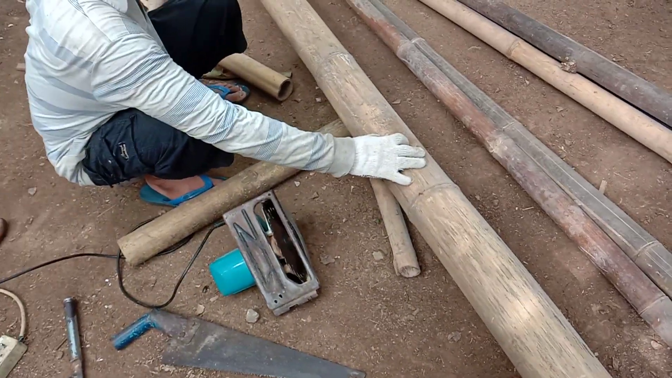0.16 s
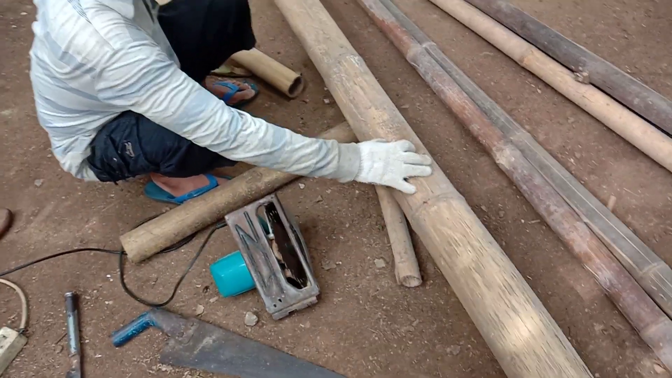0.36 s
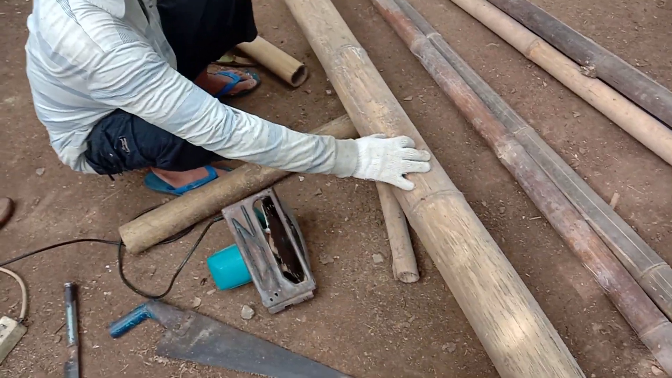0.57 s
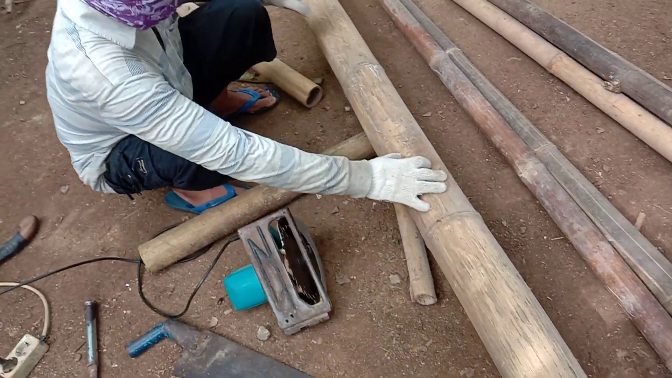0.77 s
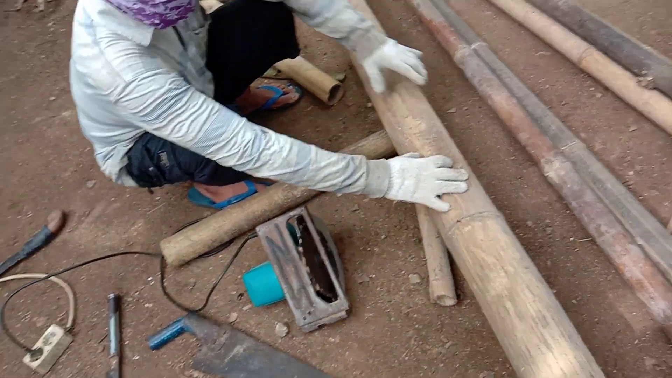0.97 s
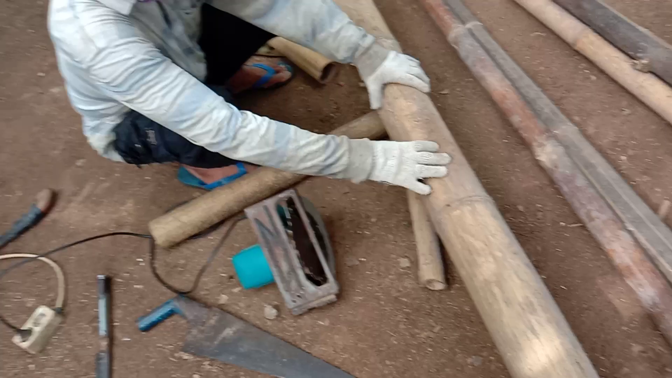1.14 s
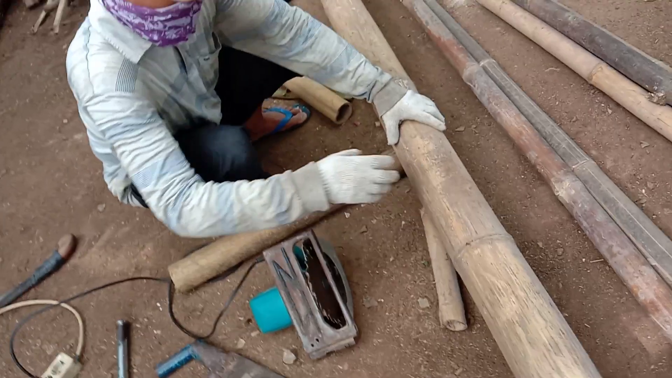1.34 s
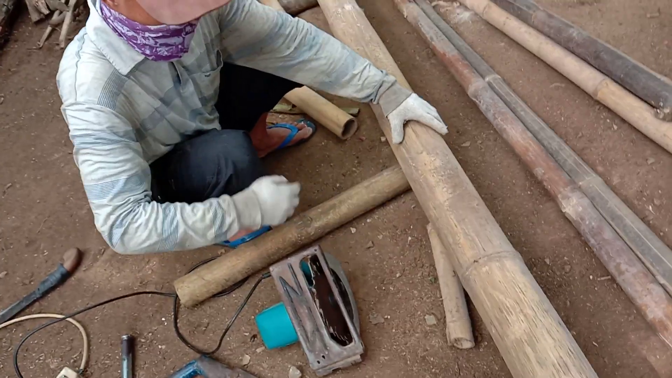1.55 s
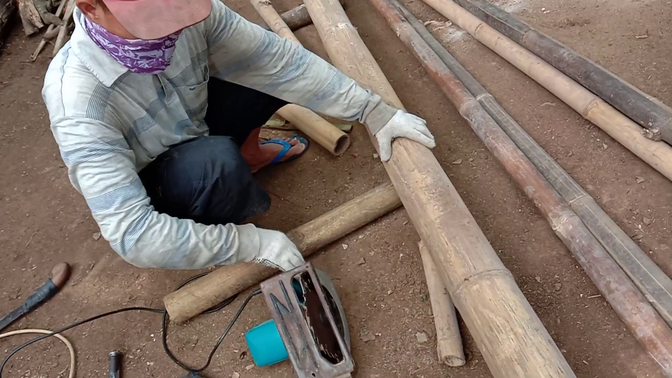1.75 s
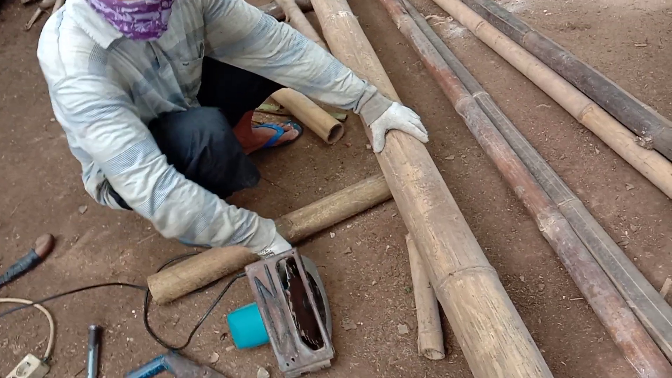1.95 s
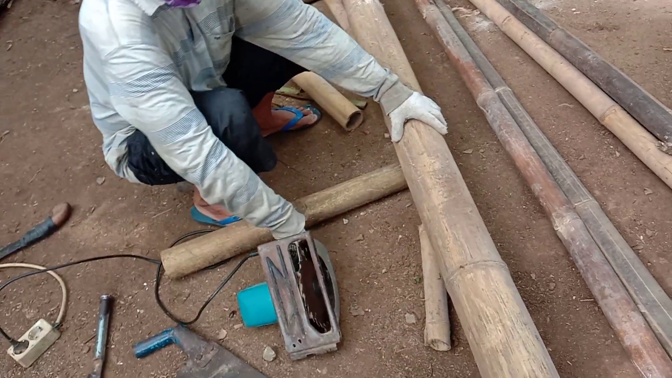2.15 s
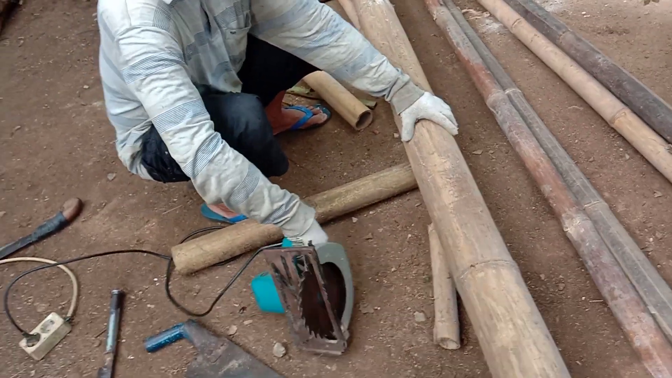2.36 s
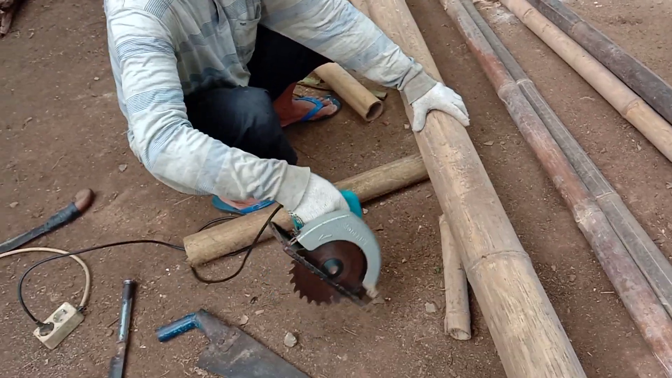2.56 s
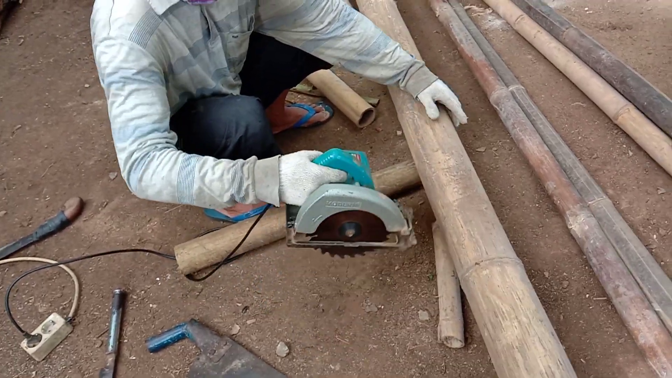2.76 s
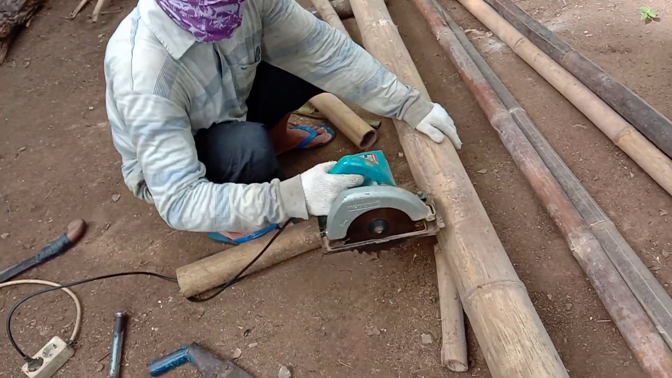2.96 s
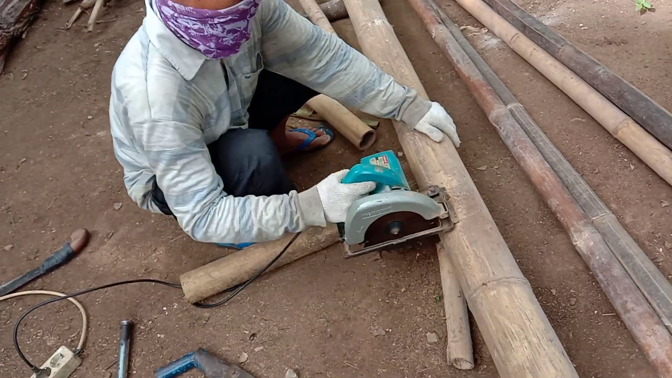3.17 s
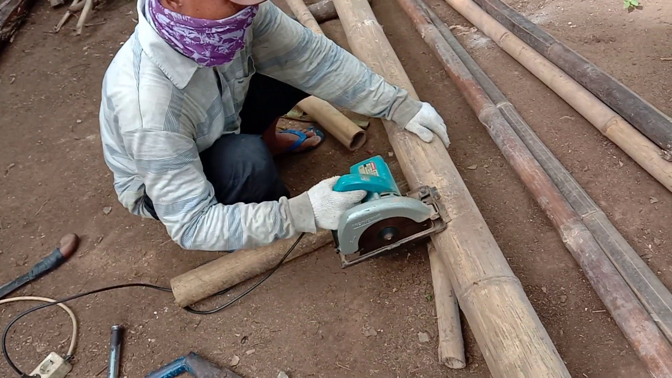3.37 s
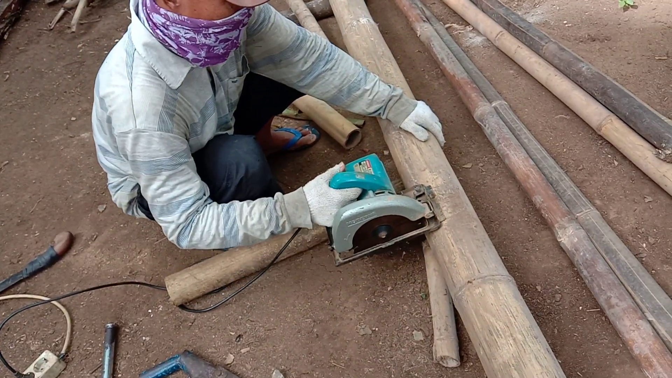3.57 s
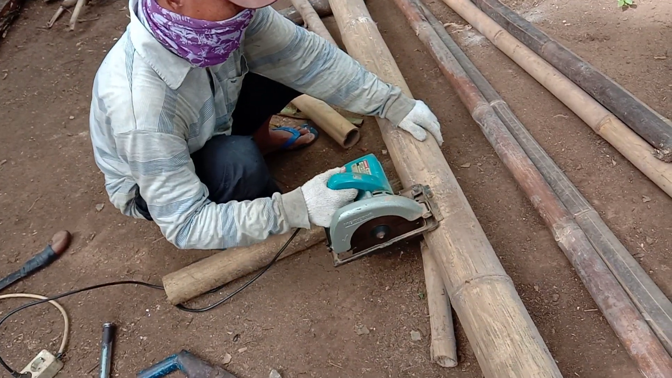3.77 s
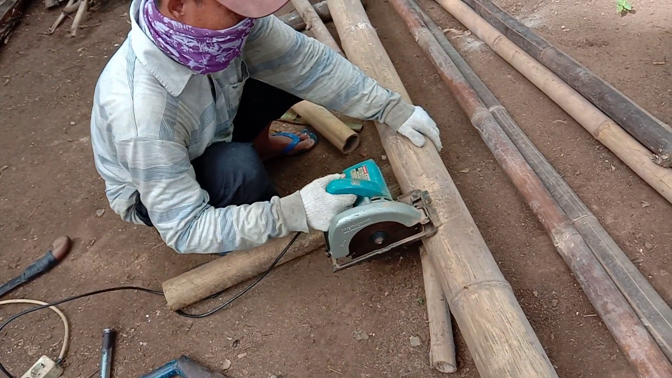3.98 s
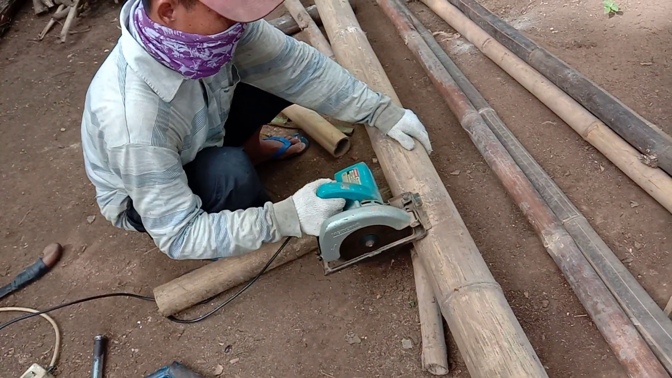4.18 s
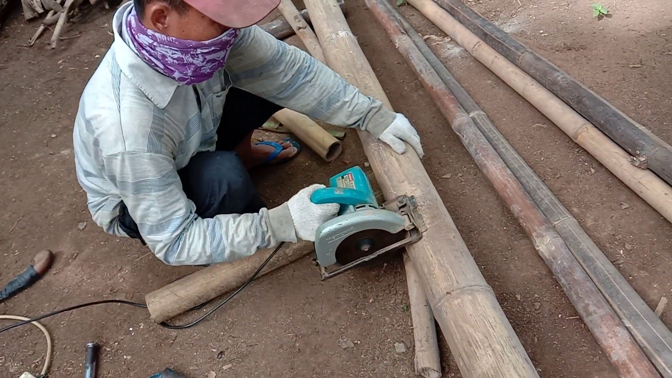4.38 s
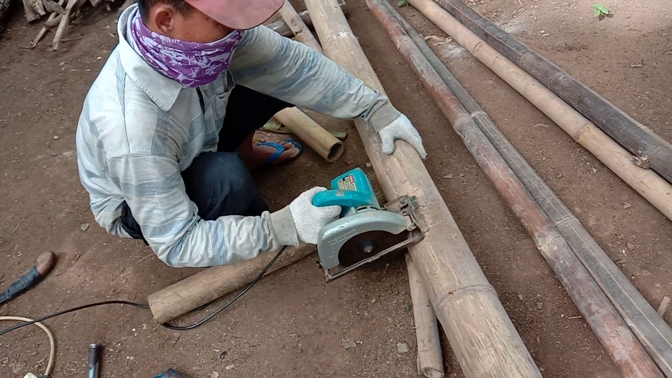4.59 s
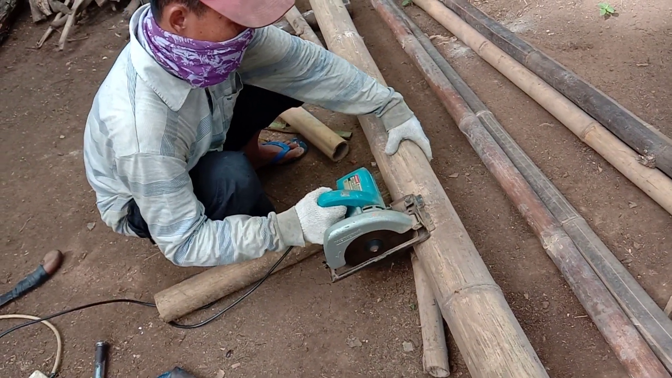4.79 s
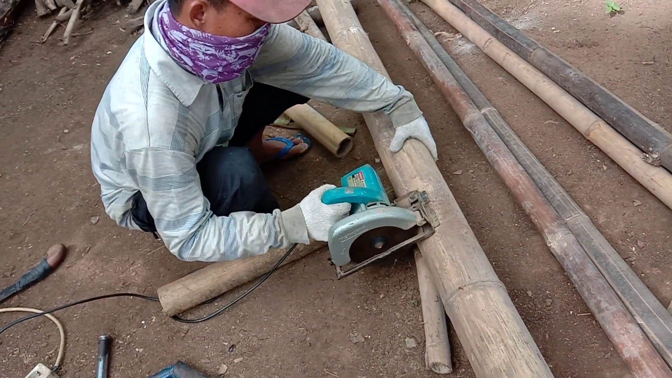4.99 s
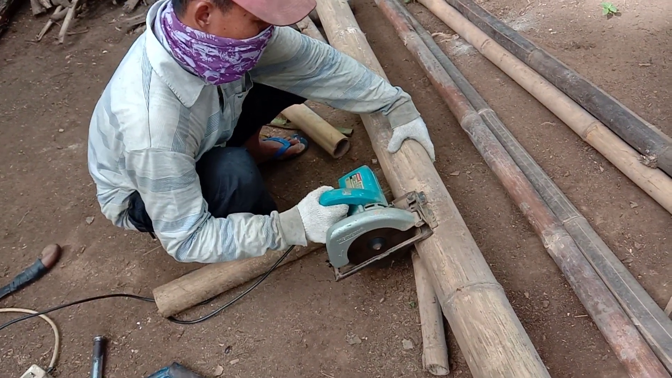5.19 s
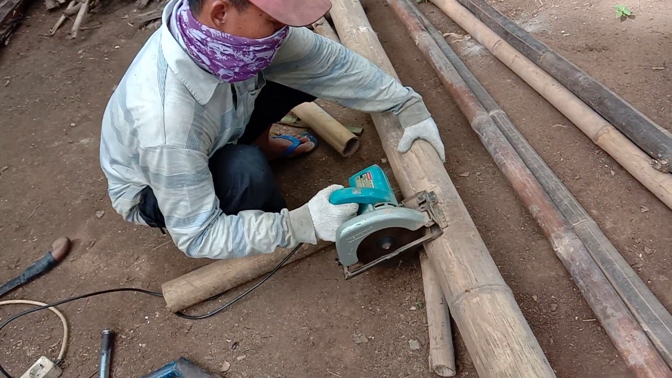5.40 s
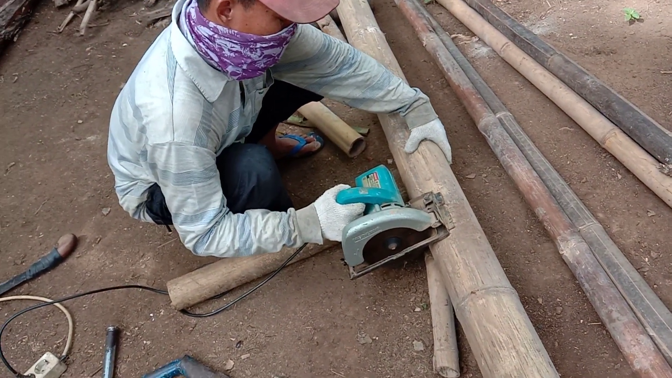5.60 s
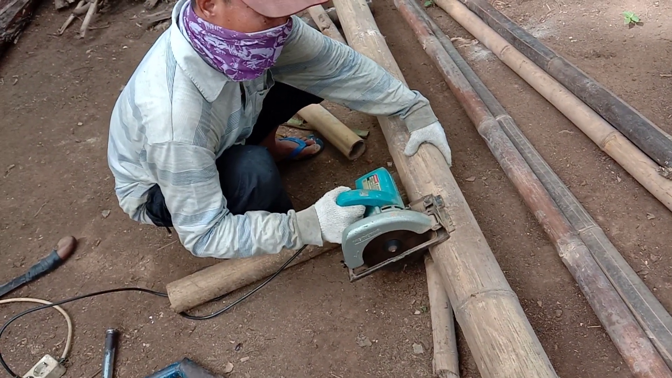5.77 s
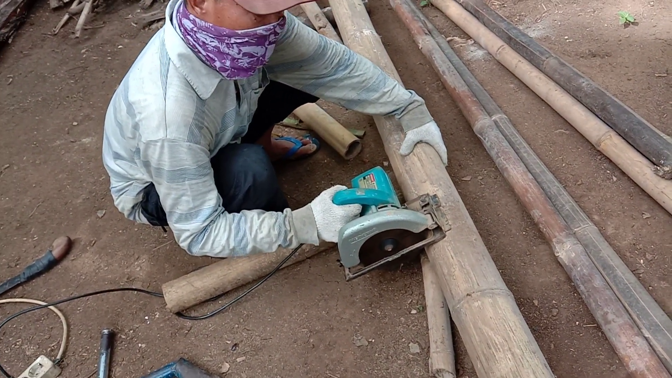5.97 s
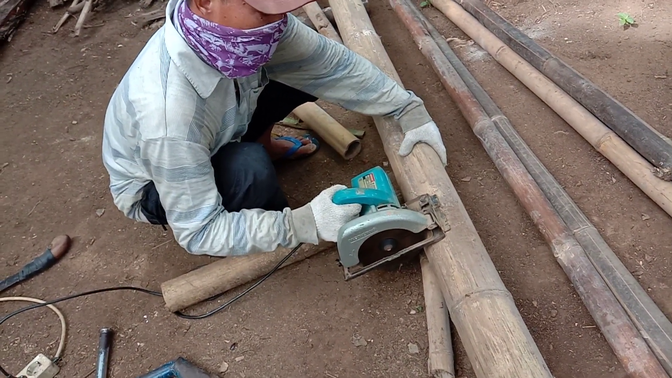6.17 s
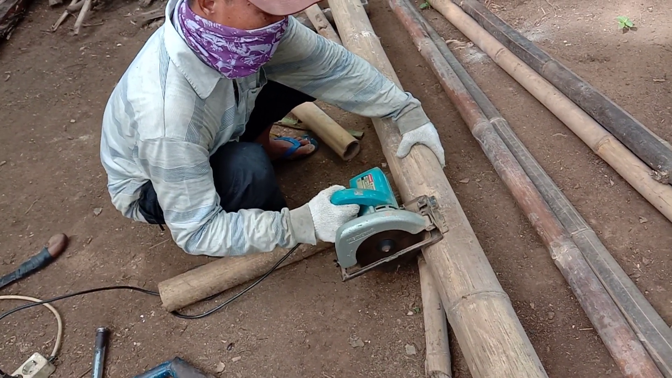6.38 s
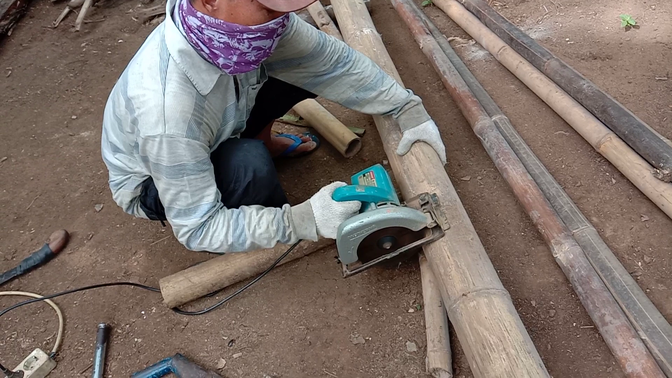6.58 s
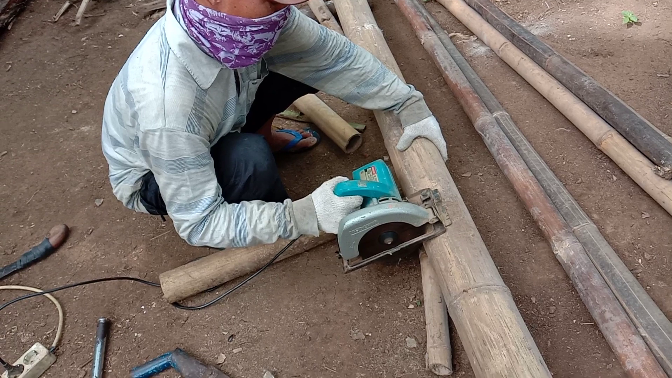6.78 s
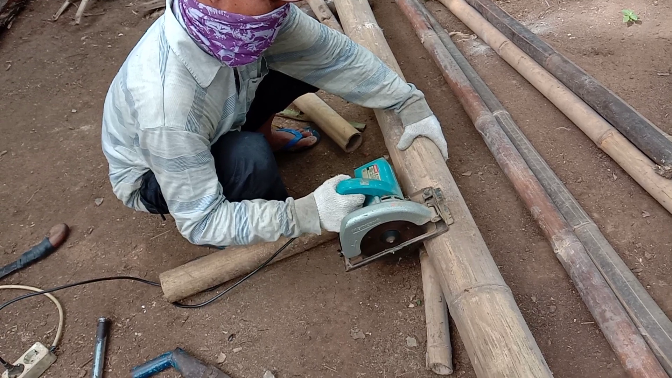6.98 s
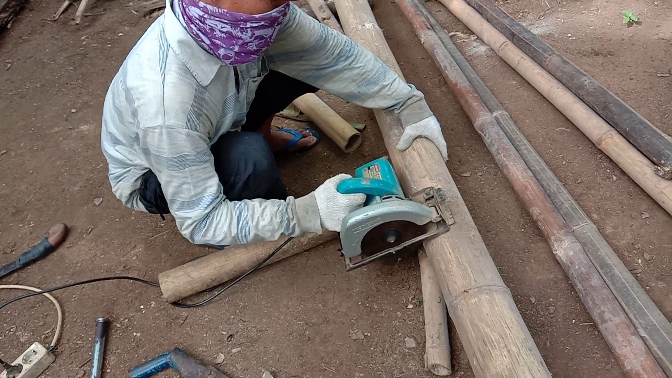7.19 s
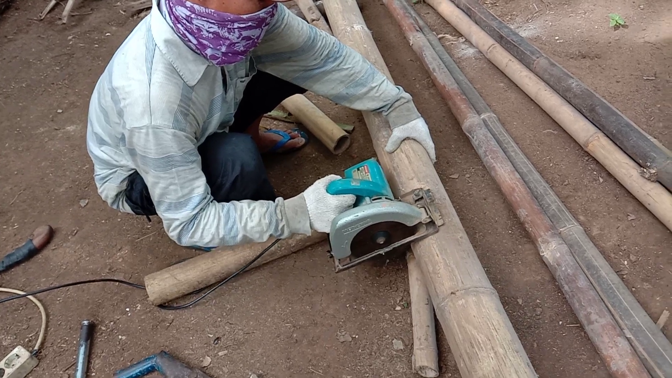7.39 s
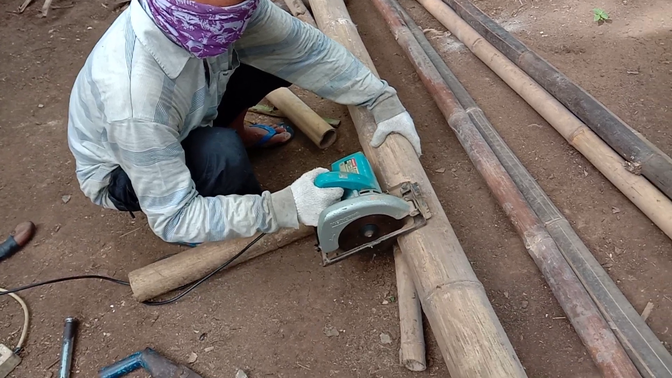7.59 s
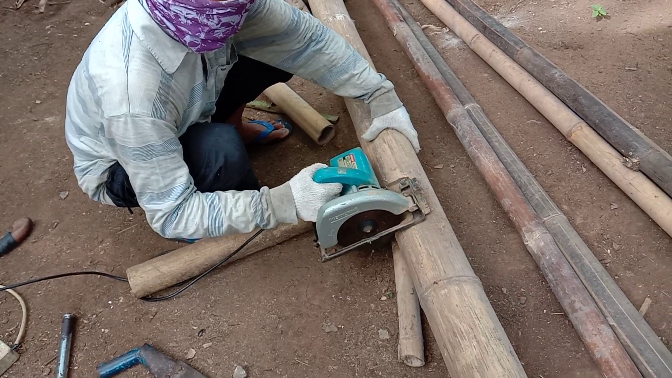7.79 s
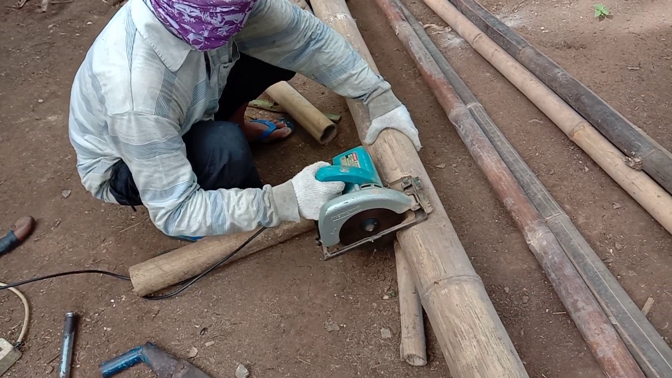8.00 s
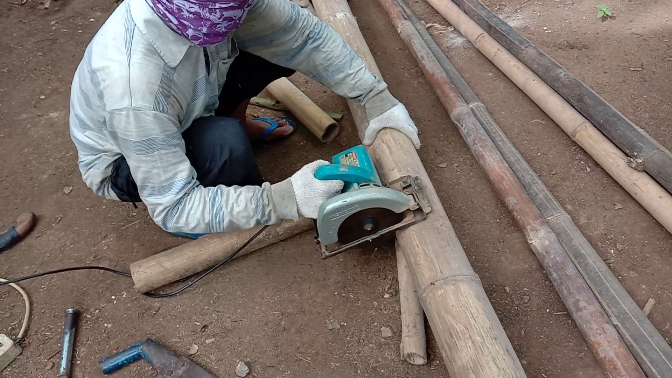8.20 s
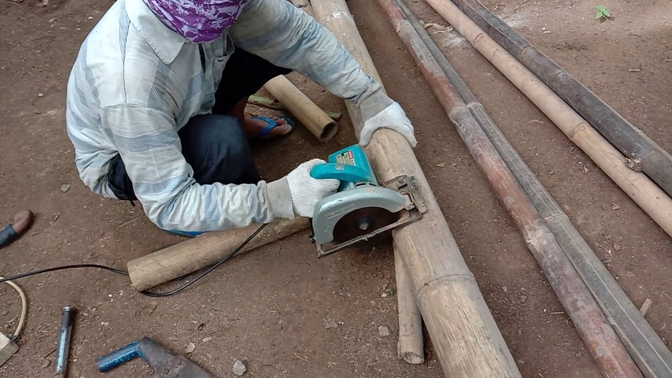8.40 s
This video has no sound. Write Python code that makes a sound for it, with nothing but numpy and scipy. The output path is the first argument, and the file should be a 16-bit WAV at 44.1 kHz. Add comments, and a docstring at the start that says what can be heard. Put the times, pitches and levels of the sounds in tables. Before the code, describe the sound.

After hollow wooden thuds and tool handling, an electric saw spins up with a rising whistle, then rasps loudly through thick bamboo outdoors.

```python
"""A circular saw spins up close by with a rising whistle; its gears and blade sing, then its teeth bite bamboo.
The saw is motor and gear harmonics, blade resonances and filtered noise, led by the stage of the work.
Before it, a worker settles a thick pole and lifts the saw: noise bursts and ringing modes knock, clank and rub.
Air and sawdust from the cut thump on the microphone as coloured noise. Outdoors, cicadas sing in narrow
noise bands, an engine throbs far off as a few sines, and the yard hushes as filtered noise."""
import sys
import numpy as np
from scipy import signal
from scipy.fft import rfft, irfft
from scipy.io import wavfile
from scipy.ndimage import uniform_filter1d

SR = 44100
rng = np.random.default_rng(int(sys.argv[2]) if len(sys.argv) > 2 else 0)


def generate_wav(sig):
    """Save sig (samples, or channels by samples) to the path in sys.argv[1] as 16-bit PCM at SR."""
    pcm = np.round(np.clip(np.atleast_2d(sig).T, -1, 1) * 32767).astype(np.int16)
    wavfile.write(sys.argv[1], SR, pcm)


N = 372644
TIME = np.arange(N) / SR  # s
FREQ = np.maximum(np.fft.rfftfreq(N, 1 / SR), 1)  # Hz

# Hush of the yard: [f/Hz, level/dB], relative
HUSH_SPECTRUM = [(15, -33), (25, -36), (95, -10), (217, -18.5), (301, -33), (328, -16.5), (366, -29.5),
                 (486, -25), (530, -30), (999, -33), (1240, -16), (1720, -36), (3110, -36), (4600, -46.5),
                 (5980, -93), (10100, -120)]
HUSH_DB = -52
# Far engine: [t/s, firing pitch f/Hz, level/dB]
FAR_ENGINE = [(1.2, 75, -58), (1.37, 74, -43), (1.55, 76, -59), (1.8, 79, -44), (2.3, 87, -51),
              (2.39, 87, -42), (3.3, 89, -35), (3.55, 91, -45.5), (4.2, 94, -55)]
# Loudness of the cicada chorus: [t/s, level/dB]
CICADA_LEVELS = [(0, -42.5), (.3, -38.5), (1, -37.5), (3.4, -37), (4.2, -39.5)]
# Bands of cicada song and faint top hiss: [f/Hz, spread/Hz, power level/dB], relative;
# half amplitude lies spread / 1.14 from the centre
CICADA_BANDS = [(5192, 39, -9), (5214, 82, -6), (5120, 70, -26), (5305, 13, 0.5), (5340, 36, -16),
                (5410, 19, -9.5), (7200, 200, -42.5), (14000, 2500, -53), (10600, 150, -44)]

# Knocks of the pole: [t/s, peak level/dB, nominal t60/s, tilt/(dB per octave), contact rise/s]
POLE_KNOCKS = [(.009, -8, 0.056, -1.5, 0.0012), (.163, -6, 0.2, 1, 0.0012), (.24, -19.5, 0.12, 3, 0.017),
               (.464, -25, 0.042, -4, 0.0013), (.545, -18, 0.18, .5, 0.0077),
               (1.155, -23.5, 0.1, 6.5, 0.00078), (1.317, -17.5, 0.2, 1, 0.0025),
               (1.825, -30.5, 0.16, -7.5, 0.0076), (1.868, -27.5, 0.16, -5, 0.017),
               (2.2, -36.5, .2, -13, .011), (2.683, -34.5, 0.2, -6.5, 0.0074),
               (3.18, -14.5, 0.17, 2, 0.0017)]
# Clanks of the saw's base plate, guard and switch: [t/s, peak level/dB, nominal t60/s,
# tilt/(dB per octave), contact rise/s]
SAW_CLANKS = [(2.349, -18.5, .2, 3.5, 0.0077), (2.408, -22, .1, 5.5, .003), (2.521, -19, .06, -1.5, .001),
              (2.575, -22, .06, -2, .0005), (2.745, -24.5, .18, -1, .008), (3.179, -9, 0.24, 1.5, .0014),
              (3.491, -34, .19, -2.5, .012), (4.201, -6, 0.049, 1, 0.0034)]
# Dull bumps and puffs of air: [t/s, peak level/dB, nominal t60/s, tilt/(dB per octave), contact rise/s]
DULL_BUMPS = [(1.045, -17, 0.042, 1, .0006), (2.944, -26, 0.047, -2, .002), (5.595, -26, 0.057, -6, .005),
              (6.335, -29.5, .07, -3, .004), (6.725, -13, 0.062, -7, 0.0054)]
# Ringing modes of the bamboo: [f/Hz, mean level/dB, longest t60/s], relative
BAMBOO_MODES = [(237, -18.5, 0.38), (395, -16, 0.27), (511, -19, 0.13), (782, 3, 0.042), (1262, -17.5, 5.0),
                (1530, -34.5, 0.48), (1920, -42, 5.0), (2040, -13, 0.094), (2234, -47, 0.68),
                (2589, -27.5, 0.2), (2770, -26, 0.11), (3830, -36, 0.33)]
# Noise of a blow on the bamboo: [f/Hz, level/dB], relative
BAMBOO_SPECTRUM = [(100, -24), (250, 5), (750, -2), (1300, -6.5), (3000, -5.5), (5000, -19.5), (8000, -38),
                   (15000, -62)]
# Ringing modes of the saw's metal parts: [f/Hz, mean level/dB, longest t60/s], relative
METAL_MODES = [(374, -17.5, 5.0), (760, -17, 5.0), (974, -27, 0.079), (1295, 1.5, 0.13), (1482, 0, 0.19),
               (1580, -24, 0.14), (1940, -32, 0.3), (2378, 1, 0.06), (2740, -21, 1.3), (3020, -31, 0.18),
               (3090, -16.5, 0.026), (3770, -40, 0.33), (4274, -56, 5.0), (5110, -21, 0.05)]
# Noise of a blow on the saw's metal parts: [f/Hz, level/dB], relative
METAL_SPECTRUM = [(100, -18), (350, -7.5), (600, -21.5), (1100, 6), (2000, -0.5), (4500, -12.5),
                  (8000, -28.5), (15000, -42)]
# Noise of a dull bump: [f/Hz, level/dB], relative
BUMP_SPECTRUM = [(30, -51), (80, 2.5), (140, -3.5), (300, -6.5), (1000, -15.5), (4000, -36), (12000, -77)]
# Strokes of gloves and sleeves: [middle t/s, half length/s, level/dB]
CLOTH_STROKES = [(.324, .016, -43.5), (0.381, 0.0065, -42), (0.909, 0.037, -44), (1.005, 0.031, -45.5),
                 (1.111, 0.023, -37), (1.208, 0.052, -39.5), (1.624, 0.061, -43), (1.976, .09, -52),
                 (2.25, 0.09, -44.5), (2.83, 0.16, -53.5), (3.268, 0.032, -52)]
# Rubbing cloth: [f/Hz, level/dB], relative
CLOTH_SPECTRUM = [(300, -6.5), (1200, 0.5), (2600, 8.5), (4500, -2.5),
                  (7000, -11.5), (8500, -27.5), (11500, -25.0), (15000, -35)]
# The clothes shuffle at random under the strokes until the worker holds still
SHUFFLE_DB, SHUFFLE_SPREAD_DB, STILL_S, SETTLE_S = -65.5, 1.5, 3.76, 0.3
# Pole juddering over its rest: [f/Hz, level/dB], relative
DRAG_SPECTRUM = [(71, -43.5), (120, -41), (222, 3.5), (260, -14), (383, -3), (1140, -5.5), (1650, -21.5),
                 (2840, -20.5), (4890, -42), (5340, -40), (8000, -63.5), (10400, -96.5), (17600, -120)]
# DRAG_DB is the level extrapolated to t = 0
DRAG_S, DRAG_STOP_S, DRAG_RELEASE_S, DRAG_DB, DRAG_FADE_DB_PER_S = 0.0083, 0.11, 0.024, -14, -90

# Air thumping on the microphone: [f/Hz, level/dB], relative
BUFFET_SPECTRUM = [(15, -57), (25, -21), (32, -34), (74, -2.5), (102, 1.5), (182, 1), (223, -1.5),
                   (335, -2.5), (800, -7.5), (1040, -12), (1760, -120)]
# Brief lulls of that air: [middle t/s, half length/s, level change/dB]
DRAUGHT_LULLS = [(7.047, 0.022, -7.5), (7.124, 0.018, -11), (7.573, 0.026, -4)]
# It sets in as the blade breaks through, and gusts
DRAUGHT_S, DRAUGHT_RISE_S, DRAUGHT_DB, GUST_DB = 6.87, 0.063, -19, 1.44

# Motor shaft turns per turn of the blade's spindle; moment of switching on
GEAR_RATIO, SWITCH_ON_S = 6.135, 4.196
# The motor closes in on its no-load speed, fast at first and then ever more slowly
NO_LOAD_HZ, SPIN_UP_S, SPIN_UP_POWER = 680, 0.182, 0.62
# Highest motor shaft speed with the blade on the pole: [t/s, shaft turns f/Hz]
LOADED_SPEED = [(5.45, 490), (5.8, 492), (6.2, 497), (6.5, 492), (6.75, 477), (6.9, 460), (7.35, 388),
                (7.5, 376), (7.8, 369), (8.1, 374), (8.45, 371)]
# The teeth first graze the pole; the bite is full once this much speed is lost
TOUCH_S, TOUCH_RISE_S, FULL_BITE_SAG_HZ = 5.43, 0.045, 60
# Stages of the work, in rows: switched on, half speed, running free, grazing the skin, biting deep;
# [level/dB, treble boost/dB, gear whine/dB re rush, blade ring/dB re rush, power share of rasp 0-1]
WORK_STAGES = [(-16.5, -20, -29, -21, 0.56), (-19, -6, -10, -26, 0.33), (-16, -2.5, -38, -38, 0),
               (-15.5, 8.5, -2.5, -4.5, 0.19), (-13, 11, -9, -8, 0.82)]
# The hand pushes the saw on: [middle t/s, half length/s, boost/dB]
HAND_PUSHES = [(7.396, 0.05, 2), (7.86, .09, 2), (8.245, 0.1, 1.7)]
# The feed is uneven in the cut
CHATTER_DB, CHATTER_PER_S = 0.88, 30
# Gear whine: [multiple of the motor shaft, free level/dB, loaded level/dB], relative
WHINE_PARTIALS = [(1, -21, -25), (2, -8, -14), (3, -12, -5), (4, 0, -4), (5, -9, -12), (6, -13, -4),
                  (7, -5, -12), (8, -6, -1), (9, -12, -10), (10, -12, -9), (11, -13, -18), (12, -4, -9),
                  (14, -11, -22), (16, -16, -22), (18, -19, -27), (20, -22, -24), (22, -19, -27),
                  (28, -28, -34), (30, -27, -34)]
# Blade resonances in which the whine flares: [f/Hz, width/Hz, boost/dB]
WHINE_PEAKS = [(1228, 61, 7.4), (1700, 48, 6.5), (4140, 750, 8)]
# Modes of the steel blade: [f/Hz, width/Hz, power level/dB], relative
BLADE_MODES = [(1224, 4.9, 1.5), (1265, 11, -7.5), (1529, 8.5, -0.5), (1596, 7.5, -0.5), (1794, 6.7, 1.5),
               (2168, 13, -4), (2585, 9.5, 1), (2520, 51, -13), (3407, 6.3, -9.5), (3480, 9.1, -5),
               (3880, 24, 0.5), (4300, 9.2, -5.5), (6770, 41, -1), (7330, 52, -4.5)]
# Fine resonances and dips of guard and housing: [f/Hz, width/Hz, boost/dB]
GUARD_PEAKS = [(1280, 57, 3.5), (3030, 650, 6), (4070, 76, 6.5), (5860, 1070, -11.5), (6690, 890, 4.5),
               (8210, 970, -8.5), (11000, 760, 3.5), (13600, 1000, -12)]
# Air and brushes, running free: [f/Hz, level/dB], relative
AIR_SPECTRUM = [(59, -64), (100, -31.5), (306, -19.5), (393, -20), (529, -16.5), (1230, 2), (1650, -4),
                (1760, -2), (3600, -5), (4000, -2.5), (5600, -6), (6770, -14), (8180, -20.5),
                (11000, -25.5), (15400, -35)]
# Teeth tearing fibres: [f/Hz, level/dB], relative
RASP_SPECTRUM = [(350, -20), (600, -24), (927, -7), (1270, 3.5), (1930, -2), (2600, 0.5), (3700, -14.5),
                 (4020, -0.5), (5060, -1.5), (5640, -5.5), (6910, -17), (8360, -20.5), (11400, -24),
                 (15400, -32)]
# Mains growl of the starting current: [f/Hz, peak level/dB]
STARTING_GROWL = [(100, -57), (200, -46.5), (300, -42.5), (400, -42.5)]
# Whistles of the free blade: [multiple of the blade's turn, level/dB at half speed, level/dB at full speed],
# before colour and damping; touching the pole damps them
BLADE_WHISTLES = [(60, -26.5, -27), (90, -33, -46), (120, -34, -48), (180, -47, -54)]
WHISTLE_DAMPING_DB = -5
# How the whistles radiate: [f/Hz, level/dB]
WHISTLE_SPECTRUM = [(1000, -35), (1900, -12), (2350, -1), (4800, -2), (5800, -12), (7000, -3), (9000, -17),
                    (13000, -16)]
# Resonances in which the whistles flare: [f/Hz, width/Hz, boost/dB]
WHISTLE_RESONANCES = [(2950, 260, 9), (3950, 400, 1.5), (5120, 300, 8)]
# The blade howls as it binds in the kerf:
# [middle t/s, half length/s, multiple of the motor shaft, level/dB before flutter]
BINDING_HOWLS = [(5.53, .09, 4, -19), (5.55, .12, 12, -32), (6.1, .35, 4, -26), (6.78, .13, 8, -29),
                 (6.98, .09, 4, -20), (7.01, .04, 3, -24), (7.06, .16, 12, -28), (7.08, .14, 16, -32),
                 (7.16, .05, 3, -20.5), (7.25, .08, 10, -22.5), (7.32, .14, 8, -25.5),
                 (7.34, .06, 6, -24.5)]
# The blade's strongest mode squeals on its own: [middle t/s, half length/s, level/dB before flutter]
MODE_SQUEALS = [(5.64, .08, -25), (5.97, 0.081, -17), (6.44, 0.078, -23.5)]
SQUEAL_HZ = 1768

TOP_HZ = 15550  # upper limit of the microphone signal


def undb(db):
    """Decibels to gain."""
    return 10 ** (np.asarray(db) / 20)


def unit(x):
    """Scale to rms 1."""
    return x / (np.std(x) + 1e-12)


def curves(table):
    """Each column of a table, joined by straight lines in time."""
    s, *columns = np.transpose(table)
    return [np.interp(TIME, s, c) for c in columns]


def during(table, fade_s):
    """1 while a table lasts, fading outside it."""
    return np.clip(1 + np.minimum(TIME - table[0][0], table[-1][0] - TIME) / fade_s, 0, 1)


def ramp(s, rise_s):
    """0 before a moment, then a straight rise to 1."""
    return np.clip((TIME - s) / rise_s, 0, 1)


def swell(s, half_s):
    """A bell-shaped rise and fall around a moment, down to 1/e at half_s from it."""
    return np.exp(-np.minimum(((TIME - s) / half_s) ** 2, 50))


def shape_db(points, freq=FREQ):
    """A spectrum joined on a log-frequency axis, falling 20 dB per octave beyond its ends."""
    hz, db = np.transpose(points)
    octaves, known = np.log2(freq), np.log2(hz)
    beyond = abs(octaves - np.clip(octaves, known.min(), known.max()))
    return np.interp(octaves, known, db) - 20 * beyond


def boost_db(resonances):
    """Gain in dB per frequency of a table of resonances."""
    return sum(db / (1 + (2 * (FREQ - f) / w) ** 2) for f, w, db in resonances)


def peaks(modes):
    """Summed resonance curves, each with the power that its dB gives."""
    return sum(undb(db) / np.sqrt(w) / (1 + (2 * (FREQ - f) / w) ** 2) for f, w, db in modes)


def colour(x, db):
    """Filter by a gain in dB per frequency; rms 1."""
    return unit(irfft(rfft(x) * undb(db), N))


def noise():
    """White noise."""
    return rng.standard_normal(N)


def walk(rate):
    """Smooth random wander, spread near 1, with about this many turns per second."""
    knots = rng.standard_normal(N // 8)
    wander = np.interp(TIME * rate, np.arange(len(knots)), knots)
    return unit(uniform_filter1d(wander, max(int(SR / rate / 2), 1)))


def grains(rate, spread_db):
    """Clicks at random moments, rate per second on average, with uneven sizes."""
    moments = rng.random(N) < rate / SR
    sizes = undb(spread_db * np.clip(noise(), -2.5, 2.5))
    return unit(moments * np.sign(noise()) * sizes)


def once_a_turn(angle, count):
    """An uneven pattern that repeats with every turn of a wheel."""
    turn = np.linspace(0, 2 * np.pi, 256)
    pattern = sum(np.cos(k * turn + rng.uniform(0, 2 * np.pi)) / k ** 1.46 for k in range(1, count + 1))
    return np.interp(angle % (2 * np.pi), turn, unit(pattern))


def yard_hush():
    """Steady noise of the open yard, with a slight wander in level."""
    return colour(noise(), shape_db(HUSH_SPECTRUM)) * undb(HUSH_DB + 0.4 * walk(6.5))


def far_engine():
    """An engine throbs far off: its firing pitch, half of it and twice it, uneven in speed and level."""
    hz, level_db = curves(FAR_ENGINE)
    firing = 2 * np.pi * np.cumsum(hz * (1 + 0.018 * walk(11))) / SR
    tones = np.sin(firing) + 0.24 * np.sin(firing / 2) + 0.063 * np.sin(2 * firing)
    throb = unit(tones * undb(4.2 * walk(16)))
    return throb * undb(level_db) * during(FAR_ENGINE, 0.42)


def cicadas():
    """Cicadas beat against each other in narrow bands of noise."""
    song = sum(undb(db) / np.sqrt(w) / (1 + (1.14 * (FREQ - f) / w) ** 4) for f, w, db in CICADA_BANDS)
    chorus = colour(noise(), 20 * np.log10(song))
    # each insect holds its loudness, so the chorus stays even
    chorus = chorus / np.sqrt(uniform_filter1d(chorus ** 2, SR // 20) + 1e-6)
    return chorus * undb(curves(CICADA_LEVELS)[0])


def outdoors():
    """Cicadas and a far engine over the hush of the yard."""
    return cicadas() + far_engine() + yard_hush()


def blows(table, modes, spectrum, ring_db, tail_db, tail_s):
    """Each blow is a short chatter of contacts, the body's modes and a faint echo from the yard."""
    out, t = np.zeros(N + SR), TIME[:SR // 2]
    freq = np.maximum(np.fft.rfftfreq(len(t), 1 / SR), 1)
    for s, db, t60, tilt_db, contact_s in table:
        chatter, echo = rng.standard_normal((2, len(t)))
        # the chatter dies 1.09 times as fast as the nominal t60
        burst = chatter * undb(-60 * t / t60 * 1.09) + echo * undb(tail_db - 60 * t / tail_s)
        body = irfft(rfft(burst) * undb(shape_db(spectrum, freq)), len(t))
        # the treble dies before the lows
        dull = signal.sosfilt(signal.butter(2, 2500, fs=SR, output="sos"), body)
        body = dull + (body - dull) * np.exp(-t / 0.03)
        # every blow lands elsewhere and favours other modes
        ring = 0 * t
        for f, mode_db, mode_t60 in modes:
            fading_db = mode_db + rng.standard_normal() - 60 * t / min(mode_t60, 1.5 * t60)
            ring = ring + undb(fading_db) * np.sin(2 * np.pi * (f * t + rng.random()))
        tilt = undb(tilt_db * np.log2(np.clip(freq, 200, 9000) / 1000))
        hit = irfft(rfft(unit(body) + undb(ring_db) * unit(ring)) * tilt, len(t))
        hit = hit * (1 - np.exp(-t / contact_s)) * (t < 0.4)
        start = int(s * SR)
        out[start:start + len(t)] += undb(db) * hit / abs(hit).max()
    return out[:N]


def pole_drag():
    """The pole judders over its rest: scraping grains that fade, then stop."""
    release = np.exp(-np.maximum(TIME - DRAG_STOP_S, 0) / DRAG_RELEASE_S)
    sliding = ramp(DRAG_S, 0.0023) * undb(DRAG_DB + DRAG_FADE_DB_PER_S * TIME) * release
    return colour(grains(900, 1.5) + 0.54 * noise(), shape_db(DRAG_SPECTRUM)) * sliding


def cloth_rub():
    """Gloves and sleeves rub in strokes, over a random shuffle of clothes."""
    strokes = sum(undb(db) * swell(s, half) for s, half, db in CLOTH_STROKES)
    shuffle = undb(SHUFFLE_DB + SHUFFLE_SPREAD_DB * walk(9.4)) * (1 - ramp(STILL_S - SETTLE_S, SETTLE_S))
    return colour(grains(520, 3.3) + noise(), shape_db(CLOTH_SPECTRUM)) * (strokes + shuffle)


def handling():
    """The pole drags and knocks; gloves rub; the saw clanks as it is lifted and set down."""
    pole = blows(POLE_KNOCKS, BAMBOO_MODES, BAMBOO_SPECTRUM, ring_db=-1.0, tail_db=-21.5, tail_s=0.52)
    plate = blows(SAW_CLANKS, METAL_MODES, METAL_SPECTRUM, ring_db=-1.5, tail_db=-13.5, tail_s=0.46)
    bumps = blows(DULL_BUMPS, [], BUMP_SPECTRUM, ring_db=-20, tail_db=-26, tail_s=0.26)
    return pole_drag() + cloth_rub() + pole + plate + bumps


def draught():
    """Eddies and flying sawdust thump on the microphone."""
    thumps = (0.7 * noise() + grains(320, 3.3)) * undb(2 * walk(45))
    lulls_db = sum(db * swell(s, half) for s, half, db in DRAUGHT_LULLS)
    level_db = DRAUGHT_DB + GUST_DB * walk(8.8) + lulls_db
    return colour(thumps, shape_db(BUFFET_SPECTRUM)) * undb(level_db) * ramp(DRAUGHT_S, DRAUGHT_RISE_S)


def motion():
    """Shaft speed and stage of the work: the motor spins up, the teeth touch, the bite drags the speed down."""
    free = NO_LOAD_HZ * (1 - (1 + np.maximum(TIME - SWITCH_ON_S, 0) / SPIN_UP_S) ** -SPIN_UP_POWER)
    held = curves(LOADED_SPEED)[0]
    hz = np.minimum(free, held)
    bite = np.clip((held.max() - held) / FULL_BITE_SAG_HZ, 0, 1)
    return hz, 2 * hz / held + ramp(TOUCH_S, TOUCH_RISE_S) + bite


def starting_growl():
    """The current surges at switch-on and falls as the motor gathers speed: a fading mains growl."""
    tones = sum(undb(db) * np.sin(2 * np.pi * f * TIME) for f, db in STARTING_GROWL)
    return tones * swell(SWITCH_ON_S, 0.4)


def gear_whine(motor, spindle, cutting):
    """Harmonics of the motor shaft; the big gear's play gives each sidebands, a little weaker under load."""
    sway = [once_a_turn(spindle, count=5) for _ in range(4)]
    flutter = [walk(35) for _ in range(3)]
    play = 0.53 * (1 - 0.17 * cutting)
    out = 0
    for i, (k, free_db, loaded_db) in enumerate(WHINE_PARTIALS):
        angle = round(k) * motor + rng.uniform(0, 2 * np.pi)
        db = free_db + (loaded_db - free_db) * cutting + 2.4 * flutter[i % 3]
        out = out + undb(db) * (np.cos(angle) + play * sway[i % 4] * np.cos(angle + i))
    # a partial flares as it glides through a resonance of the blade
    return colour(out, boost_db(WHINE_PEAKS))


def whistles(spindle, stage):
    """The blade's whistles glide up and flare in each resonance they cross; the higher ones fade with speed."""
    tones = 0
    for k, half_db, full_db in BLADE_WHISTLES:
        db = np.interp(stage, [1, 2], [half_db, full_db]) + 2.4 * walk(70)
        tones = tones + undb(db) * np.sin(round(k) * spindle)
    radiation_db = shape_db(WHISTLE_SPECTRUM) + boost_db(WHISTLE_RESONANCES)
    tones = irfft(rfft(tones) * undb(radiation_db), N)
    return np.sqrt(2) * tones * undb(WHISTLE_DAMPING_DB * ramp(TOUCH_S, TOUCH_RISE_S))


def howls(motor, spindle):
    """Shaft partials swell and flutter as the blade binds; its own mode squeals at a nearly steady pitch."""
    slip = 0.5 * walk(20)  # radians
    tones = 0
    for s, half, k, db in BINDING_HOWLS:
        angle = round(k) * motor + slip + rng.uniform(0, 2 * np.pi)
        tones = tones + undb(db) * swell(s, half) * np.sin(angle)
    # the flutter repeats with each turn of the blade
    flutter = (1 + 0.55 * np.cos(spindle) + 0.3 * np.cos(2 * spindle + 1)) * undb(1.5 * walk(60))
    mode = np.sin(2 * np.pi * np.cumsum(SQUEAL_HZ + 3 * walk(15)) / SR) * undb(2 * walk(30))
    squeal = mode * sum(undb(db) * swell(s, half) for s, half, db in MODE_SQUEALS)
    return np.sqrt(2) * (tones * flutter + squeal)


def free_air(spindle):
    """Fan and brushes rush; the gears rattle in step with the spindle."""
    rattle = undb(0.67 * once_a_turn(spindle, count=5) + 0.9 * walk(90))
    source = (noise() + 0.56 * grains(2500, 4.2)) * rattle
    return colour(source, shape_db(AIR_SPECTRUM) + boost_db(GUARD_PEAKS))


def tooth_rasp(spindle):
    """Each of 24 teeth snaps a few fibres, some teeth deeper than others."""
    teeth = np.exp(1.1 * np.cos(24 * spindle))
    bite = undb(1.2 * once_a_turn(spindle, count=4) + 0.9 * walk(60))
    source = (noise() + 0.39 * grains(3000, 4)) * teeth * bite
    return colour(source, shape_db(RASP_SPECTRUM) + boost_db(GUARD_PEAKS))


def saw():
    """Fan air, motor and gear whine, blade whistle and ring, and teeth tearing fibres."""
    hz, stage = motion()
    level_db, treble_db, whine_db, ring_db, cutting = (
        np.interp(stage, np.arange(len(WORK_STAGES)), c) for c in np.transpose(WORK_STAGES))
    cutting = np.clip(cutting, 0, 1)
    level_db = level_db + sum(db * swell(s, half) for s, half, db in HAND_PUSHES)
    level_db = level_db + CHATTER_DB * cutting * walk(CHATTER_PER_S)
    # shaft angles in radians; the speed shakes more once the teeth are loaded
    shake = (0.000517 + 0.00253 * cutting) * walk(25)
    motor = 2 * np.pi * np.cumsum(hz * (1 + shake)) / SR
    spindle = motor / GEAR_RATIO
    rush = np.sqrt(1 - cutting) * free_air(spindle) + np.sqrt(cutting) * tooth_rasp(spindle)
    # harder work brightens the hiss
    top = irfft(rfft(rush) / (1 + (6200 / FREQ) ** 6), N)
    rush = rush + (undb(treble_db) - 1) * top
    # the blade's own modes stay put while everything else glides
    ring = colour(noise(), 20 * np.log10(peaks(BLADE_MODES)))
    # a hum at five times the blade's turn, growing steeply with speed
    hum = undb(-26 + 1.5 * walk(12)) * np.sqrt(2) * np.sin(5 * spindle) * (hz / hz.max()) ** 6
    whine = undb(whine_db) * gear_whine(motor, spindle, cutting)
    total = rush + hum + whine + undb(ring_db) * ring
    # the tones take their share of the saw's power
    total = total / np.sqrt(1 + undb(whine_db) ** 2 + undb(ring_db) ** 2)
    running = total * undb(level_db) + whistles(spindle, stage) + howls(motor, spindle) + starting_growl()
    return running * ramp(SWITCH_ON_S, 0.0046)


def scene():
    """Everything at one microphone."""
    return (outdoors() + handling() + draught() + saw())[None]


def record(dry):
    """The phone rounds the highest peaks and cuts the top."""
    rounded = dry / (1 + abs(dry) ** 6) ** (1 / 6)
    return signal.sosfilt(signal.ellip(12, 0.1, 80, TOP_HZ, fs=SR, output="sos"), rounded)


dry = scene()
out = record(dry)
generate_wav(out)
```